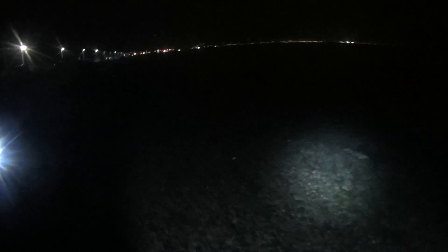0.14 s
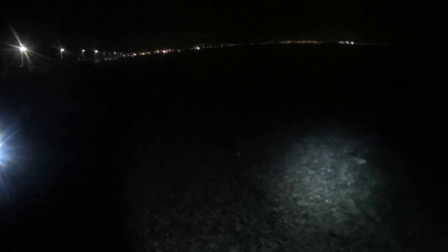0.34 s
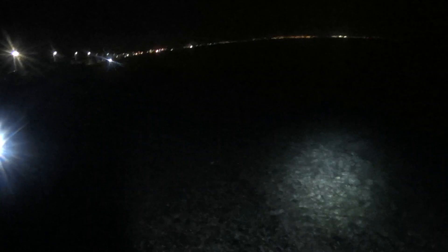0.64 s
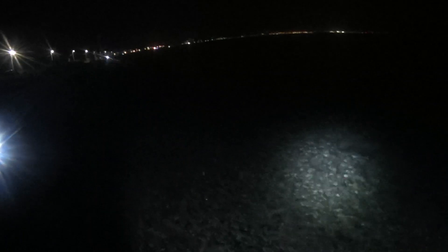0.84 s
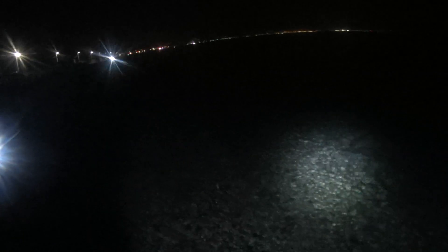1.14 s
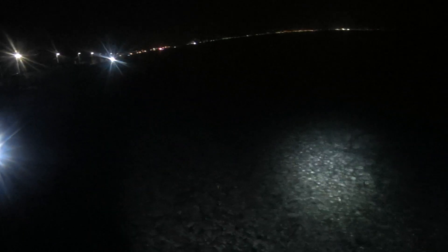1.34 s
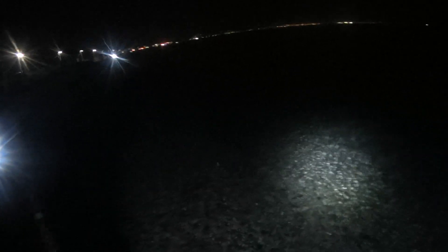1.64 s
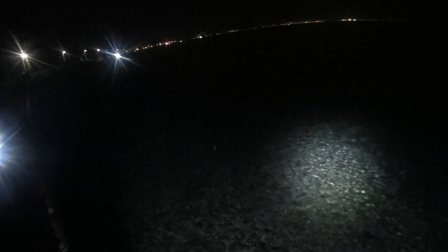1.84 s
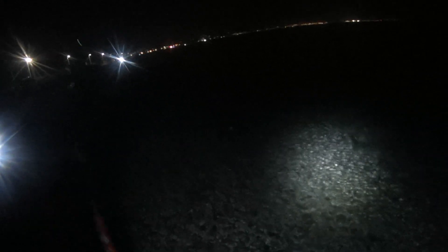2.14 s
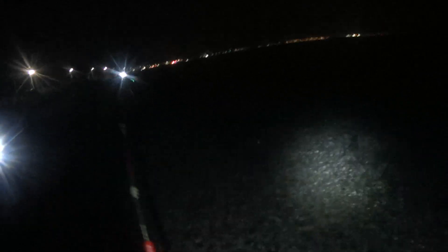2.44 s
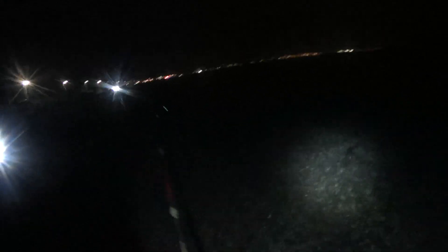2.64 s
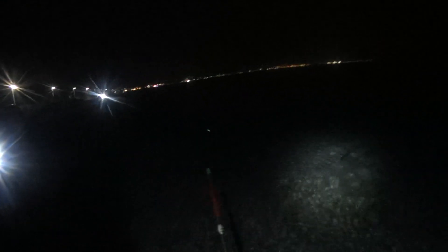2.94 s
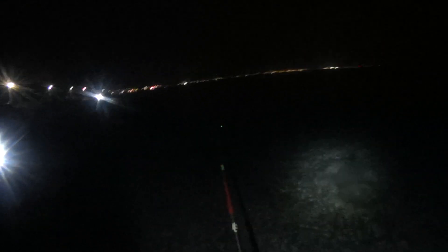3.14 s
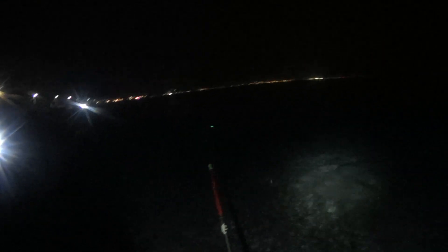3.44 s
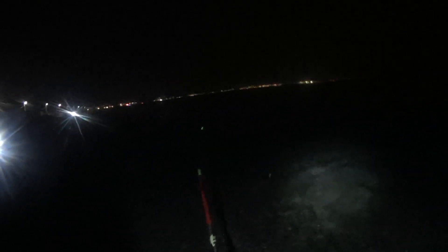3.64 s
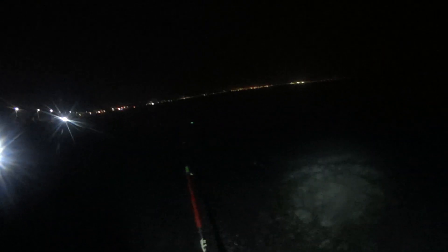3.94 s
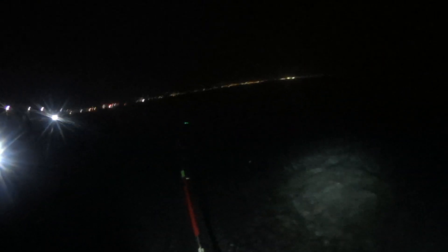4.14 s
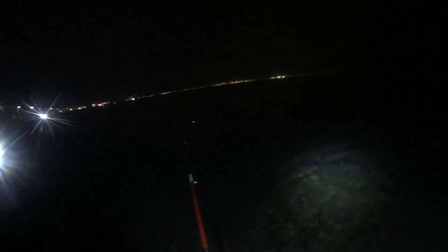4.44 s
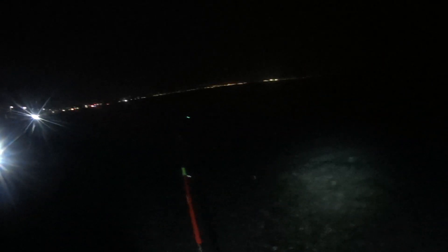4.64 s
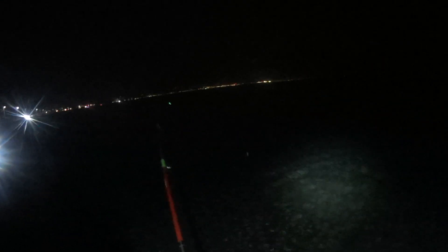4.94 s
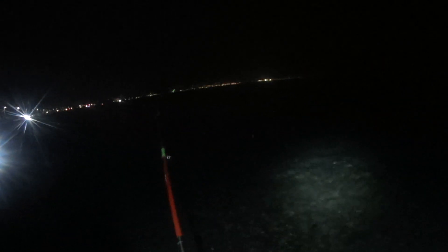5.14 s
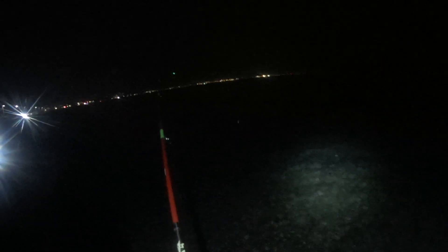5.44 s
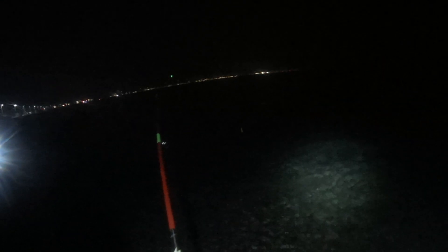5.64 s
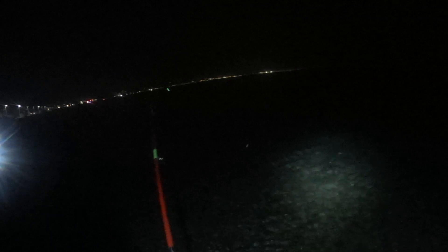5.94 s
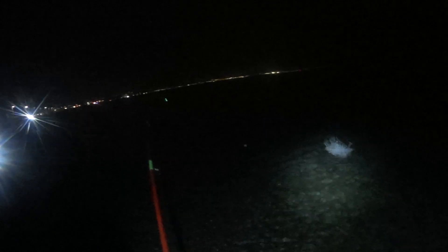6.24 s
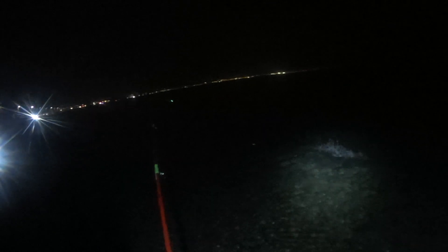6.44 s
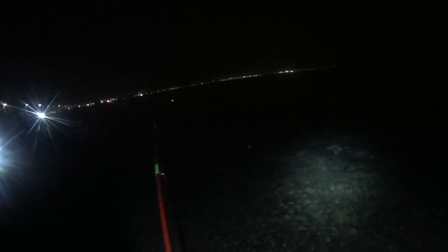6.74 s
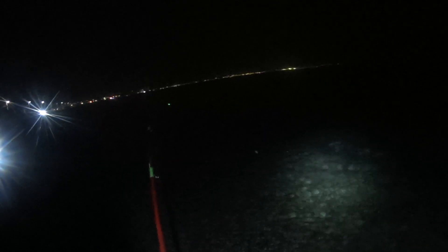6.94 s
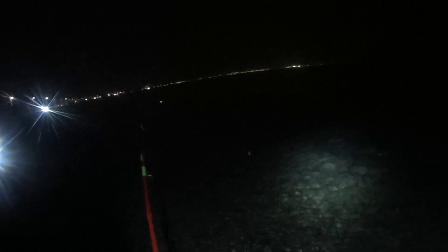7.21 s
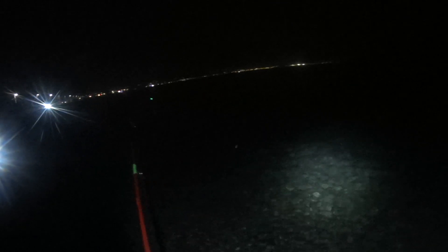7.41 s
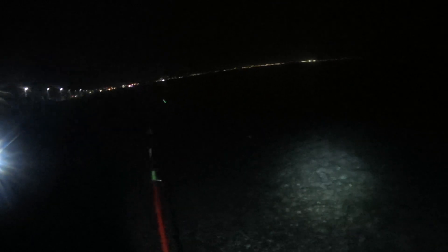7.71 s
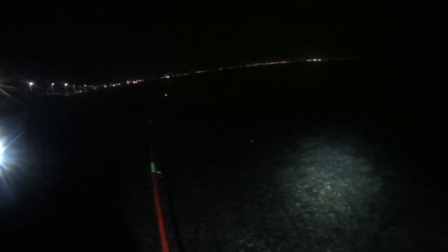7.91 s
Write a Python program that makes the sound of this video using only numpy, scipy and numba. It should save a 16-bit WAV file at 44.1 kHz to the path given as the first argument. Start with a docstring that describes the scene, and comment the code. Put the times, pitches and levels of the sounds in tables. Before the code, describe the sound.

At night on a pebble beach, an angler's boots crunch through loose shingle, with sharp stone clacks, sliding pebbles and dull bumps on the close microphone. A fishing reel ticks quickly for a moment, a few hollow plops follow, then the heavy crunching resumes and slides to a stop. Soft steps and a small splash come at the water's edge, leaving faint smooth surf and a distant generator hum.

```python
"""Pebble beach at night, 8 s, over filtered-noise surf, a far generator's sine orders and a faint shingle trickle.
0-2.4 s: an angler's boot crunches shingle (random contacts), bumps hit the microphone (short pulses), stones
knock (noise bursts), loosened stones slide. 1.8-2.4 s: a reel ratchet ticks (ringing modes), then hollow plops
(pulses). 2.9-6 s: more pushes, knocks and another slide of loosened stones. 6-6.9 s: soft steps, plops and a
small splash at the water's edge. Last faint knocks from 7.6 s."""
import sys
import numpy as np
from scipy import signal
from scipy.fft import rfft, irfft
from scipy.io import wavfile
from scipy.ndimage import uniform_filter1d
from numba import njit

SR = 44100
rng = np.random.default_rng(int(sys.argv[2]) if len(sys.argv) > 2 else 0)


def master(y):
    """Save y as 16-bit WAV."""
    cut = np.clip(np.atleast_2d(y).T, -1, 1)
    pcm = np.round(cut * 32767)  # scale
    wavfile.write(sys.argv[1], SR, pcm.astype(np.int16))


N = 356119

# Far surf spectrum. Each row: frequency in Hz, relative level in dB per Hz.
SURF_SPECTRUM = [(24, -40), (40, -1), (142, -2), (189, 4), (340, -4), (494, -8), (625, -25.5), (1130, 5),
                 (1460, 3.5), (2560, -20), (2950, -8.5), (11000, -16), (14300, -54.5), (22000, -120)]
# Mean surf level. Each row: time in seconds, level in dB.
SURF_LEVEL = [(0, -51.5), (1.8, -53), (2.5, -54), (5.6, -47.5), (6.5, -49), (7.2, -49), (8.08, -48)]
# Orders of the generator. Each row: multiple of GENERATOR_HZ, relative mean level in dB.
GENERATOR_ORDERS = [(1, -5), (2, 0.5), (4, -8), (6, 1.5), (7, 6), (8, 2), (10, -16), (13, -4), (15, -8),
                    (17, -3), (18, -23.5), (19, 1), (20, -4), (21, 1), (22, -6), (24, -2.5), (25, -2.5),
                    (28, -4), (30, -4)]
GENERATOR_HZ, GENERATOR_END_DB = 70.67, -57.5   # mean speed; gain at the end, before that it follows the surf

# Small stones grinding. Each row: frequency in Hz, relative level in dB per Hz.
GRIT_SPECTRUM = [(1650, -26), (2800, -0.5), (3580, -1.5), (4630, 1.5), (6570, 3), (10600, 1), (11000, -1.5),
                 (14300, -100), (22000, -120)]
# Trickle of the bed at rest. Each row: time in seconds, then relative levels in dB of grit,
# hollow of the bed and larger stones.
TRICKLE = [(0, -50, -54, -55), (2.101, -48.5, -52.5, -54), (2.85, -52, -50, -53), (5.7, -55, -52.5, -50),
           (6.6, -52, -50.5, -49.5), (8.08, -59.5, -49.5, -49.5)]
# A boot pushes into the shingle. Each row: time of full force in seconds, rise per 20 dB in seconds,
# hold in seconds, fall per 20 dB in seconds (signs of these three ignored), relative levels in dB of
# grit, hollow and larger stones, hollow pitch in Hz, grit tilt in dB (treble over bass).
PUSHES = [(0.045, 0.77, .035, .06, -19, -23, -26, 930, 0),
          (0.44, .06, .06, .12, -20, -30, -27.5, 820, -1.5),
          (0.558, 0.0261, 0.126, 0.1142, -29.5, -28, -30.5, 898, 0),
          (0.695, .02, .06, .2, -20, -25, -23.5, 1046, 4),
          (0.821, 0.0676, 0.137, 0.0932, -24, -29.5, -25, 960, 3),
          (0.979, 0.0213, 0.0333, 0.051, -17.5, -26, -23.5, 860, 1.5),
          (2.499, .11, 0.0274, -0.08, -40, -42, -49, 900, -0.5),
          (2.571, 0.25, 0.144, .15, -45, -49, -54, 620, -3.5),
          (2.862, -0.0149, 0.0051, -0.0154, -24.5, -35.5, -32, 500, 1.5),
          (2.921, 0.13, 0.0046, 0.118, -21, -28, -27, 520, -1.5),
          (3.071, 0.2844, 0.047, 0.155, -19, -25, -28.5, 950, -1),
          (3.258, .1, 0.0046, .04, -22, -28.5, -33, 537, -2),
          (3.47, .06, .012, .02, -36, -28, -36, 620, -4),
          (3.53, 0.01, 0.027, 0.2053, -18, -27.5, -35, 740, -1.5),
          (3.688, 0.2445, 0.062, 0.19, -18, -24.5, -27, 543, -2.5),
          (3.83, 0.24, .06, .045, -34, -28, -40, 640, -4),
          (3.975, .06, .065, .05, -20, -37.5, -35.5, 660, -0.5),
          (4.071, 0.0133, 0.069, 0.09, -18.5, -34, -40, 717, -1),
          (4.211, 0.123, 0.0357, 0.0549, -19.5, -28.5, -37, 900, -1.6),
          (4.376, 0.11, 0.0357, 0.1532, -20, -27, -37.5, 880, 0),
          (4.581, 0.2973, 0.0048, .5, -22, -26, -31, 540, -2.5),
          (4.849, 0.4559, .03, .06, -24.5, -30, -26.5, 660, -2.5),
          (5.985, .05, .02, 0.06, -47, -40, -45, 720, -2.5), (6.09, .06, .08, 0.12, -41, -35, -45, 647, -4),
          (6.285, .05, .03, .1, -47, -39, -48, 480, -4),
          (6.4, .5, .005, 0.6149, -41.5, -42.5, -48.5, 673, -4.5)]
# Loosened stones slide on. Each row: start in seconds, stop in seconds, relative levels in dB of grit,
# hollow and larger stones, hollow pitch in Hz, grit tilt in dB, jerkiness from 0 to 1.
SLIDES = [(0.109, .41, -29.5, -37, -39, 800, 4.5, .55), (1.033, 2.4, -25.5, -30.5, -28.5, 850, -.6, .4),
          (3.278, 3.485, -29.5, -30, -34, 562, -4.5, .3), (4.904, 6.002, -31, -28.5, -25, 850, -3, .3)]
# A boot touches down. Each entry: time in seconds.
LANDINGS_S = [0, 0.427, 2.852, 3.51, 3.936, 5.965]
LANDING_S = .006   # per 20 dB of extra rise before the landing
SLIDE_RISE_S, SLIDE_STOP_S, SLIDE_LOSS_DB_PER_S = 0.047, 0.021, 32   # first two per 20 dB
LOWS_RISE_FACTOR, LOWS_FALL_FACTOR = 1.187, 1.376   # hollow and larger stones rise and fall more gently
TRICKLE_HOLLOW_HZ, TRICKLE_TILT_DB = 626, -2
PUSH_JERK, TRICKLE_JERK = .26, .45   # 0 even grinding, 1 separate slips

# Wind and cloth on the microphone. Each row: time in seconds, mean level in dB.
RUMBLE_LEVEL = [(0, -32.5), (.3, -35.5), (.4, -52.5), (.7, -44.5), (1, -34.5), (1.3, -41), (1.55, -48.5),
                (1.8, -43), (2, -48.5), (2.75, -54), (3.5, -50.5), (3.9, -41), (4.3, -42.5), (4.55, -52),
                (5.4, -60.5), (8.08, -66.5)]
# Rumble spectrum. Each row: frequency in Hz, relative level in dB per Hz.
RUMBLE_SPECTRUM = [(12, -44), (20, -9.5), (103, -1), (190, -3), (275, -12.5), (320, -9), (420, -18),
                   (700, -120)]
# Bumps on the microphone. Each row: time of envelope peak in seconds, relative level in dB, pitch in Hz.
BUMPS = [(0.027, -19.5, 154), (0.068, -27, 158), (0.121, -16, 193.6), (0.138, -25, 146), (0.179, -18, 172),
         (0.191, -19.5, 173), (0.243, -15.5, 183.1), (0.294, -25.5, 165), (0.824, -25, 133),
         (0.932, -24.5, 124.5), (1.079, -26, 125), (1.107, -16, 189.5), (1.704, -34, 143),
         (1.775, -32, 159), (1.81, -36, 132.4), (2.749, -26.5, 185), (3.876, -25.5, 147),
         (3.898, -28, 133.4), (3.915, -29, 128), (4.063, -23.5, 157), (4.219, -30, 142), (4.256, -28, 134),
         (4.278, -27.5, 140.4), (4.633, -31.5, 136), (5.026, -19.5, 179)]
# Single stones knocking. Each row: time in seconds, relative level in dB, ring frequency in Hz.
STONES = [(0.2853, -10.5, 6850), (0.3194, -12, 7000), (0.3499, -11, 6890), (0.3817, -12, 8700),
          (0.4324, -9, 5120), (0.4598, -6, 7250), (0.4934, -2, 8620), (0.5254, -9, 6210),
          (0.6458, -13.5, 8770), (0.69, -6, 9700), (0.873, -8.5, 8500), (1.1283, -15.5, 5160),
          (1.2495, -4.5, 10270), (1.3047, -16, 10500), (1.3363, -17, 9400), (1.3879, -7.5, 10650),
          (1.3965, -9, 5900), (1.4488, -13, 5300), (1.501, -12, 7100), (1.5695, -12.5, 11000),
          (1.577, -13.5, 6650), (1.6364, -12.5, 9140), (1.6745, -18, 7090), (2.576, -19.5, 4920),
          (2.5986, -16.5, 8700), (2.6215, -19, 6910), (2.6344, -20, 8010), (2.6636, -15, 6400),
          (2.7021, -9.5, 7900), (2.7313, -19.5, 8750), (2.8576, -4.5, 5440), (2.8869, 0.5, 6010),
          (3.234, -9, 4700), (3.26, -4, 9300), (3.9381, 0.5, 10580), (3.9622, -6, 5400),
          (3.9722, -3.5, 8200), (4.0063, -2, 6750), (4.0244, 1.5, 6410), (4.037, -2, 5740),
          (4.0652, -3, 5170), (4.1096, 1, 6140), (4.1596, -8, 6340), (4.547, -9.5, 5200),
          (4.6375, -2.5, 5790), (5.9973, -27, 6000), (6.0712, -20, 5880), (6.1024, -19, 5000),
          (6.132, -21, 5000), (6.1649, -18, 5700), (6.2816, -21, 6400), (7.6499, -26.5, 3600),
          (7.89, -25, 4840), (7.9145, -27.5, 5850), (8.0041, -30.5, 10740)]

# Modes of the reel's pawl. Each row: frequency in Hz, relative level in dB, 60 dB decay in seconds.
PAWL_MODES = [(3345, -11.5, 0.037), (3536, -3, 0.0136), (5365, -13, 0.0112), (6270, -2, 0.0069),
              (7510, 2, 0.0061), (8580, -2.5, 0.0052), (9660, 0.5, 0.0066), (10410, 0, 0.0121)]
# The reel is turned twice. Each turn is a list of rows: time in seconds, gear teeth per second.
REEL_TURNS = [
    [(1.7734, 18.46), (1.848, 23.13), (1.977, 42.51), (2.066, 105.76), (2.16, 44.05), (2.27, 21.61),
     (2.346, 10.67)],
    [(2.363, 46.5), (2.445, 56.5)],
]
# Level of each turn. Each row: relative mean level in dB of the first tooth, of the last tooth.
TURN_LEVELS = [(-24, -26.5), (-24.5, -29)]
TOOTH_SPREAD_DB = 1.3   # standard deviation

# Hollow plops, stones settling and a small splash at the water's edge. Each row: time of envelope
# peak in seconds, envelope peak in dB, pitch in Hz.
CLUNKS = [(2.475, -32, 950), (2.491, -29, 870), (2.518, -28.5, 625), (2.533, -35, 905), (5.985, -35, 727),
          (5.998, -30.5, 788), (6.075, -21.5, 710), (6.099, -23.5, 389.3), (6.119, -29.5, 440),
          (6.133, -36, 430), (6.146, -33, 815), (6.164, -23.5, 775), (6.186, -34, 604), (6.199, -24.5, 656),
          (6.277, -30, 313), (6.301, -29.5, 378), (6.32, -30.5, 692), (6.56, -35, 470)]

# Phase between the microphone's ports. Each row: frequency in Hz, left minus right in radians.
PORT_PHASE = [(0, 0), (260, -0.8), (1030, -1.2), (1380, -0.8), (2240, -0.8), (3530, -0.4), (6720, -0.3),
              (7580, -0.0), (12000, -0.1)]
# Balance of the ports. Each row: frequency in Hz, left minus right in dB.
PORT_BALANCE = [(60, -1.5), (170, 0), (500, 0.5), (1420, -1.0), (4090, -1), (11800, -0.5)]
# Part that differs between the ports. Each row: frequency in Hz, gain in dB.
PORT_UNLIKE = [(30, -38.5), (120, -10.5), (300, -14.5), (1000, -14.5), (2200, -8.5), (6000, -11),
               (11000, -14)]
CUTOFF_HZ = 11000


def from_db(db):
    """Amplitude of a level."""
    return 10 ** (np.asarray(db) / 20)


def rms_one(x):
    """Scales x to rms 1."""
    return x / np.sqrt(np.mean(x ** 2) + 1e-20)


def in_time(rows):
    """Columns of a curve table at every sample."""
    s, *columns = np.transpose(rows)
    return [np.interp(np.arange(N) / SR, s, c) for c in columns]


def at_hz(points):
    """A spectrum table at every bin, straight on a log axis."""
    hz, value = np.transpose(points)
    bins_hz = np.fft.rfftfreq(N, 1 / SR)
    return np.interp(np.log(bins_hz + 1), np.log(hz + 1), value)


def colour(x, spectrum):
    """Multiplies x by the spectrum; rms 1."""
    return rms_one(irfft(rfft(x) * from_db(at_hz(spectrum)), N))


def passband(x, low_hz, high_hz):
    """A band of x; rms 1."""
    sos = signal.butter(2, [low_hz, high_hz], "band", fs=SR, output="sos")
    return rms_one(signal.sosfilt(sos, x))


def drift(rate_hz):
    """Slow chance, spread 1: noise through a double pole at a tenth of the sample rate."""
    r = np.exp(-20 * np.pi * rate_hz / SR)
    noise = rng.standard_normal(N // 10 + 8002)
    slow = signal.lfilter([1], [1, -2 * r, r * r], noise)[8000:]   # settled part
    return np.interp(np.arange(N) / 10, np.arange(len(slow)), rms_one(slow))


def ring(clicks, hz, t60_s):
    """Two-pole resonance: a unit click sets off a decaying sine of initial height 1."""
    r, w = from_db(-60 / (t60_s * SR)), 2 * np.pi * hz / SR
    return signal.lfilter([0, np.sin(w)], [1, -2 * r * np.cos(w), r * r], clicks + 1e-18)


def add(out, s, sound):
    """Lays a short sound into out at s."""
    i = round(s * SR)
    out[i:i + len(sound)] += sound[:N - i]


def pulses(table, rise_cycles, swings):
    """Soft blows: a few sine cycles whose envelope peaks at the given time and dies."""
    out = np.zeros(N)
    for (s, peak_db, hz), swing in zip(table, swings):
        cycles = np.arange(round(8 * rise_cycles * SR / hz)) * hz / SR
        envelope = cycles / rise_cycles * np.exp(1 - cycles / rise_cycles)
        pulse = swing * from_db(peak_db) * envelope * np.sin(2 * np.pi * cycles)
        add(out, s - rise_cycles / hz, pulse)
    return out


def background():
    """Smooth far surf, and the orders of a steady engine that waver on their way through the air."""
    surf = colour(rng.standard_normal(N), SURF_SPECTRUM) * from_db(0.75 * drift(8.4))
    turns = np.cumsum(GENERATOR_HZ * (1 + 0.002008 * drift(0.7095))) / SR
    hum = np.zeros(N)
    for multiple, db in GENERATOR_ORDERS:
        level = from_db(db + 2.0 * drift(1.53))
        hum += level * np.sin(2 * np.pi * (multiple * turns + rng.random()))
    level_db = in_time(SURF_LEVEL)[0]
    return from_db(level_db) * surf + from_db(GENERATOR_END_DB + level_db - level_db[-1]) * hum


def bed_motion():
    """Powers of all movers add up; hollow pitch, grit tilt and jerk are means weighted by power."""
    t = np.arange(0, N, 32) / SR
    rise = np.array([[1], [LOWS_RISE_FACTOR], [LOWS_RISE_FACTOR]])
    fall = np.array([[1], [LOWS_FALL_FACTOR], [LOWS_FALL_FACTOR]])
    s, *levels = np.transpose(TRICKLE)
    trickle_db = np.array([np.interp(t, s, db) for db in levels])
    movers = [(trickle_db, TRICKLE_HOLLOW_HZ, TRICKLE_TILT_DB, TRICKLE_JERK)]
    for s, rise_s, hold_s, fall_s, *db, hz, tilt_db in PUSHES:
        early = np.maximum(s - t, 0)
        late = np.maximum(t - s - abs(hold_s), 0)
        landing = max(x for x in LANDINGS_S if x <= s + LANDING_S)
        in_air = np.maximum(landing - t, 0) / LANDING_S
        slopes = early / (abs(rise_s) * rise) + late / (abs(fall_s) * fall) + in_air
        movers.append((np.c_[db] - 20 * slopes, hz, tilt_db, PUSH_JERK))
    for s, stop_s, *db, hz, tilt_db, jerk in SLIDES:
        edges = np.maximum(s - t, 0) / SLIDE_RISE_S + np.maximum(t - stop_s, 0) / SLIDE_STOP_S
        loss_db = SLIDE_LOSS_DB_PER_S * np.maximum(t - s, 0)
        movers.append((np.c_[db] - 20 * edges - loss_db, hz, tilt_db, jerk))
    powers = [from_db(2 * np.maximum(db, -150)) for db, *_ in movers]
    total = sum(powers)
    hollow_hz = sum(p[1] * hz for p, (_, hz, *_) in zip(powers, movers)) / total[1]
    tilt_db, jerk = sum(p[0] * np.c_[list(mover[2:])] for p, mover in zip(powers, movers)) / total[0]
    curves = (*10 * np.log10(total), hollow_hz, tilt_db, jerk)
    return [np.interp(np.arange(N) / SR, t, c) for c in curves]


def contacts(per_s, spread_db, jerk):
    """Stone contacts at random, few large among many small; the bed slips suddenly and each slip dies away."""
    sizes = from_db(spread_db * np.minimum(rng.exponential(1, N), 5)) * rng.choice([-1, 1], N)
    starts = rng.uniform(0.168, 1, N) * (rng.random(N) < 110 / SR)   # 110 slips per s
    slips = signal.lfilter([1], [1, -np.exp(-1 / (0.00242 * SR))], starts)
    clumps = 1 - jerk + 2.676 * jerk * np.tanh(slips)   # overlapping slips do not add up fully
    even = np.sqrt(uniform_filter1d(clumps ** 2, size=SR // 12))   # slips share out the same push
    return rms_one(sizes * (rng.random(N) < per_s / SR) * clumps / even)


@njit
def moving_resonance(x, turn, r):
    """Two-pole resonance whose centre (radians a sample) moves."""
    y = np.zeros(len(x))
    for i in range(2, len(x)):
        drive = (1 - r * r) / 2 * (x[i] - x[i - 2])
        y[i] = drive + 2 * r * np.cos(turn[i]) * y[i - 1] - r * r * y[i - 2]
    return y


def shingle(motion):
    """Grit hisses in the treble; larger stones clatter below it and ring the air between them."""
    grit_db, hollow_db, larger_db, hollow_hz, tilt_db, jerk = motion
    jerk = np.clip(jerk, 0, .9)
    fine = contacts(9000, spread_db=2.5, jerk=jerk)
    grit = colour(fine, GRIT_SPECTRUM)
    coarse = signal.sosfilt(signal.butter(2, 7000, fs=SR, output="sos"), grit)
    grit = from_db(-tilt_db / 2) * coarse + from_db(tilt_db / 2) * (grit - coarse)
    larger = 0.646 * fine + contacts(2000, spread_db=2.5, jerk=0.537 * jerk)
    narrow = moving_resonance(larger, 2 * np.pi * hollow_hz / SR, np.exp(-np.pi * 200 / SR))   # 200 Hz wide
    hollow = rms_one(rms_one(narrow) + 1.15 * passband(larger, 361.7, 1420))
    clatter = passband(larger, 1138, 2423)
    return from_db(grit_db) * grit + from_db(hollow_db + 1.7353) * hollow + from_db(larger_db - 4.5) * clatter


def handling(swings):
    """Bumps push the membrane for about one cycle, over a lumpy rumble."""
    lumps = from_db(in_time(RUMBLE_LEVEL)[0] + 2.4 * drift(2.93))
    rumble = lumps * colour(rng.standard_normal(N), RUMBLE_SPECTRUM)
    return pulses(BUMPS, .55, swings) + rumble


def stones():
    """A snap and a crack of noise that dies in a few ms, strongest in a broad ring, over a dull knock."""
    out, t = np.zeros(N), np.arange(1300) / SR
    bright = signal.butter(2, 4000, "high", fs=SR, output="sos")
    dull = signal.butter(2, [900, 3500], "band", fs=SR, output="sos")
    for s, level_db, hz in STONES:
        noise = rng.standard_normal(len(t))
        crack = noise * np.exp(-t / 0.00189)
        crack[0] = 3.48 * np.sign(noise[0])   # the first touch
        top = signal.sosfilt(bright, crack) + .3 * ring(crack, hz, 14 / hz)
        low = signal.sosfilt(dull, crack)
        knock = top / np.abs(top).max() + from_db(-20.0) * low / np.abs(low).max()
        add(out, s, from_db(level_db + 1.85) * knock)
    return out


def teeth():
    """Samples at which a gear tooth passes the pawl (whole steps of the summed rate), and the turn's level."""
    at, level_db = [], []
    for rows, turn_db in zip(REEL_TURNS, TURN_LEVELS):
        s, per_s = np.transpose(rows)
        i = np.arange(round(s[0] * SR), round(s[-1] * SR))
        passed = np.floor(np.cumsum(np.interp(i / SR, s, per_s)) / SR)
        at.extend(i[np.diff(passed, prepend=-1) > 0])
        level_db.extend(np.linspace(*turn_db, len(at) - len(level_db)))
    return np.array(at), np.array(level_db)


def reel():
    """Each tooth drops the pawl with a short chatter that strikes every mode a little differently."""
    at, turn_db = teeth()
    out = np.zeros(N)
    tooth_db = turn_db + TOOTH_SPREAD_DB * rng.standard_normal(len(at))
    strike_db = rng.normal(0, 2.5, (len(at), len(PAWL_MODES)))
    chatter = rng.standard_normal(N)
    chatter[at] = 3.5   # a hard first touch
    for k, (hz, level_db, t60_s) in enumerate(PAWL_MODES):
        clicks = np.zeros(N)
        clicks[at] = from_db(tooth_db + level_db - 25 + strike_db[:, k])
        strikes = signal.lfilter([1], [1, -np.exp(-1 / (0.001964 * SR))], clicks) * chatter
        out += ring(strikes, hz, t60_s)
    # the dry tick of the contact itself
    clicks = np.zeros(N)
    clicks[at] = from_db(tooth_db - 10.5)
    tick = signal.lfilter([1], [1, -np.exp(-1 / (0.00098 * SR))], clicks) * chatter
    return out + signal.sosfilt(signal.butter(2, 4500, "high", fs=SR, output="sos"), tick)


def plops():
    """Hollow plops: pulses of a few cycles, each pushing or pulling first."""
    return pulses(CLUNKS, 1.637, rng.choice([-1, 1], len(CLUNKS)))


def scene():
    """A second draw of surf, hum, shingle and handling differs between the ports; surf and hum lie a bit left."""
    far = background()
    motion = bed_motion()
    mid = far + shingle(motion) + handling(np.ones(len(BUMPS))) + stones() + reel() + plops()
    unlike = from_db(-1.5) * background() + shingle(motion) + handling(rng.normal(0, 1, len(BUMPS)))
    side = irfft(rfft(unlike) * from_db(at_hz(PORT_UNLIKE)), N) + 0.203 * far
    return np.array([mid + side, mid - side])


def record(dry):
    """The ports differ in phase and level by pitch; peaks are rounded and the top is cut."""
    half = np.exp(.5j * at_hz(PORT_PHASE)) * from_db(at_hz(PORT_BALANCE) / 2)
    ports = irfft(rfft(dry) * [half, 1 / half], N)
    rounded = .7 * np.tanh(ports / .7)
    return signal.sosfilt(signal.cheby1(14, .5, CUTOFF_HZ, fs=SR, output="sos"), rounded)


dry = scene()
out = record(dry)
master(out)
```